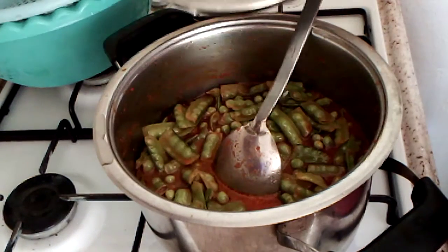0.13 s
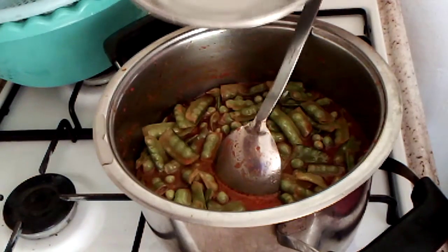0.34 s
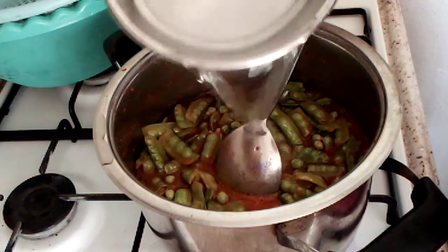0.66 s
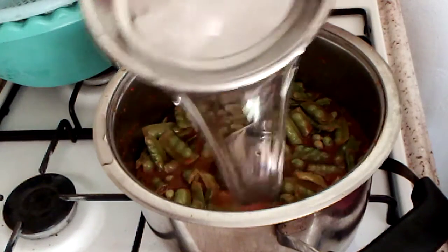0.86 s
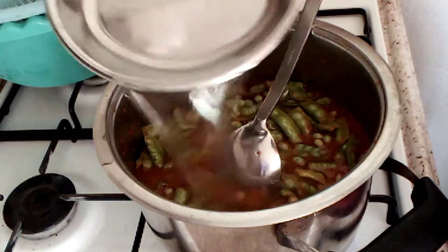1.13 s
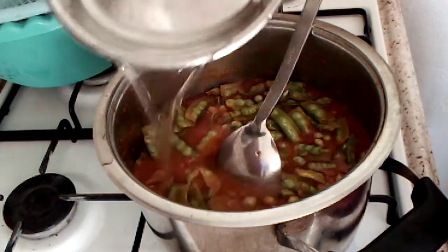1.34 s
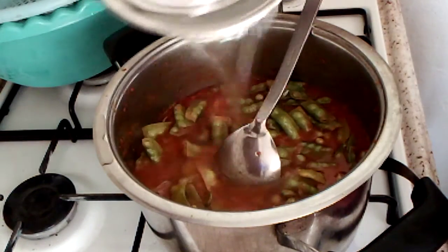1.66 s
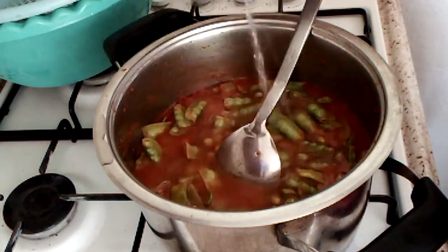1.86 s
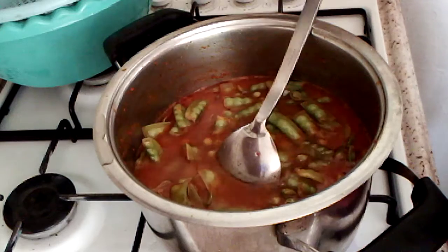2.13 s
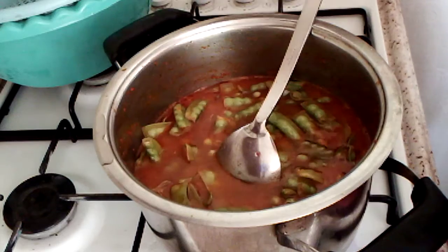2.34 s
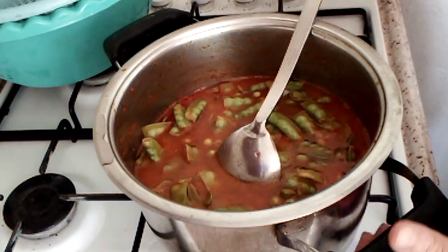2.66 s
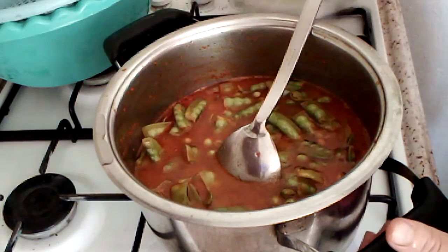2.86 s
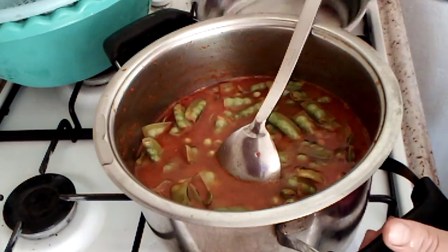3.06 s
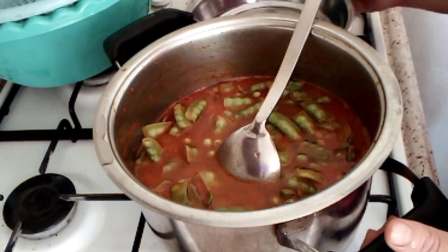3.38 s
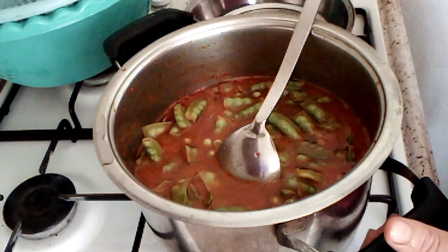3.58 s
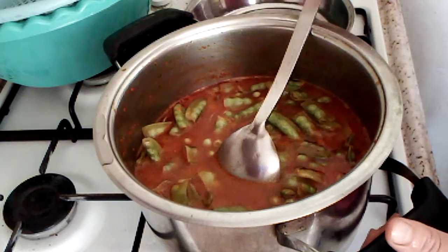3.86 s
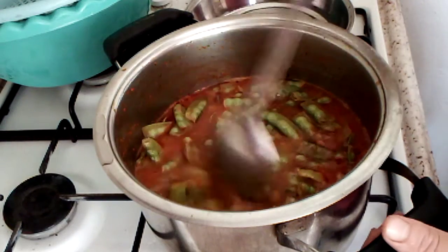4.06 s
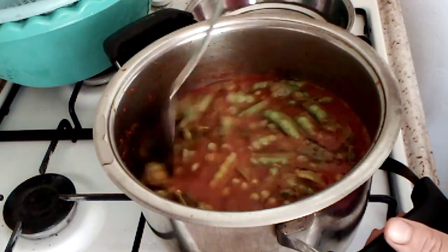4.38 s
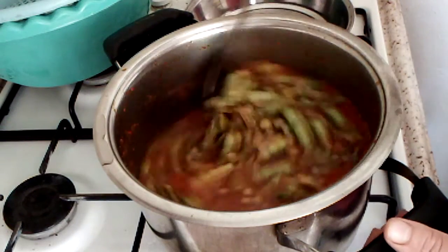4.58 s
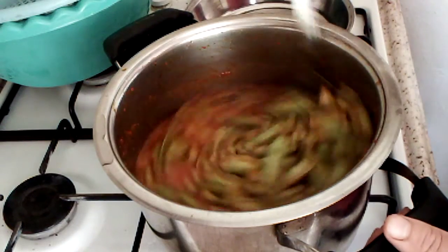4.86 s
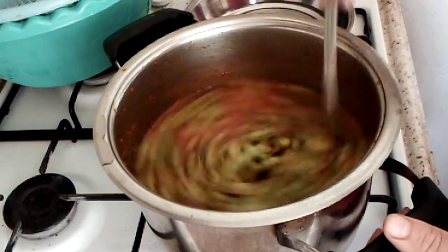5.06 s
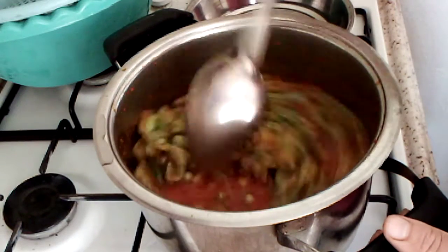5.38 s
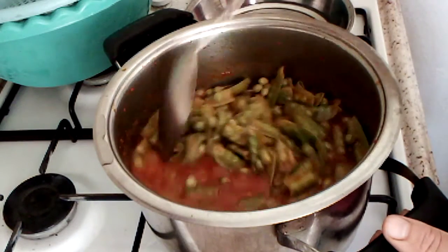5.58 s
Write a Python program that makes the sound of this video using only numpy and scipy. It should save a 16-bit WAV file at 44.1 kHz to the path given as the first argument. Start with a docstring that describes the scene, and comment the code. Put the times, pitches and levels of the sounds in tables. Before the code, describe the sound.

Soft burner hiss, then a short, bubbly pour of water into a pot of beans, fizzing and humming in the metal. A pause with a thin squeak, a hard ringing clang of a steel bowl, and a lid rocking faster and softer until still. A metal ladle then knocks and drags around the pot in two strong scraping strokes with wet plops. Close microphone, single channel, short hard-walled kitchen echo.

```python
"""Water, bowl, lid and ladle around a pot of stew

Over the soft rush of a gas flame, water from a steel bowl pours onto a pot of beans: clouds of bubbles, single
drops, and air humming in the pot. A thin squeak follows. The bowl lands with a clang and is nudged along, and
a steel lid rattles to rest: ringing modes plus dense clatter. A metal ladle knocks on the pot, scrapes its wall
(tiny slips through resonances) and pushes waves of bubbling stew. A small kitchen adds its echo.
"""
import sys
import numpy as np
from scipy import signal
from scipy.fft import rfft, irfft, next_fast_len
from scipy.io import wavfile

SR = 44100
rng = np.random.default_rng(int(sys.argv[2]) if len(sys.argv) > 2 else 0)


def transcribe(u):
    """Save the signal u as a 16-bit wav file named by the first command-line argument.

    u: samples, shape (n,) or (channels, n), limited to [-1, 1]; the rate is SR.
    q: integer samples, one column per channel.
    """
    v = np.clip(np.atleast_2d(u).T, -1, 1)
    q = np.round(v * 32767).astype(np.int16)
    wavfile.write(sys.argv[1], SR, q)


N = 251811
TIME = np.arange(N) / SR
CUTOFF_HZ = 15950  # top of the treble


def from_db(db):
    """Turn decibels into a gain."""
    return 10 ** (np.asarray(db) / 20)


def rms_one(x):
    """Scale a sound to an rms of 1."""
    return x / np.sqrt(np.mean(x ** 2) + 1e-20)


def gains(rows):
    """Turn each dB column of a curve into a gain over time, silent outside its span."""
    seconds, *columns = np.transpose(rows)
    return [from_db(np.interp(TIME, seconds, c, left=-np.inf, right=-np.inf)) for c in columns]


def held(start, length, attack_s, release_s):
    """A gain that rises quickly, holds and dies away."""
    age = np.maximum(TIME - start, 0)
    rise = 1 - np.exp(-age / attack_s)
    return rise * np.exp(-np.maximum(age - length, 0) / release_s)


def drift(rate):
    """A random wander around 0 with a spread of about 1, aiming at `rate` new values a second."""
    return np.interp(TIME * rate, np.arange(2000), rng.standard_normal(2000))


def at_hz(points, hz):
    """Read a table between its points, on a logarithmic frequency axis."""
    table_hz, value = np.transpose(points)
    return np.interp(np.log(hz + 1e-9), np.log(table_hz), value)


def colour(x, spectrum):
    """Shape a steady sound by a spectrum, to an rms of 1."""
    size = next_fast_len(len(x))
    gain = from_db(at_hz(spectrum, np.fft.rfftfreq(size, 1 / SR)))
    return rms_one(irfft(rfft(x, size) * gain, size)[:len(x)])


def convolve(x, response):
    """Play a sound through a response."""
    return signal.fftconvolve(x, response)[:N]


def low_pass(x, cut_hz):
    """Dull a sound gently above a frequency."""
    return signal.lfilter(*signal.butter(1, cut_hz, fs=SR), x)


def ring(clicks, hz, t60):
    """Each unit click starts a sine of height 1 that falls by 60 dB in t60 seconds."""
    radius, angle = from_db(-60 / (t60 * SR)), 2 * np.pi * hz / SR
    feedback = [1, -2 * radius * np.cos(angle), radius ** 2]
    return signal.lfilter([0, np.sin(angle)], feedback, clicks + 1e-18)  # the tiny offset keeps the filter fast


def resonance(x, hz, width_hz):
    """A single resonance that picks out the band around its pitch."""
    radius = np.exp(-np.pi * width_hz / SR)
    feedback = [1, -2 * radius * np.cos(2 * np.pi * hz / SR), radius ** 2]
    return (1 - radius ** 2) * signal.lfilter([1, 0, -1], feedback, x)


def resonate(x, peaks):
    """Add up resonances side by side, with alternating signs, to an rms of 1."""
    return rms_one(sum((-1) ** k * from_db(db) * resonance(x, hz, width)
                       for k, (hz, width, db) in enumerate(peaks)))


def strikes(hits, spread_db=0):
    """One click per contact, its strength varied by chance."""
    clicks = np.zeros(N)
    for start, db in hits:
        clicks[round(start * SR)] += from_db(db + spread_db * rng.standard_normal())
    return clicks


def grains(per_s, spread_db):
    """Random clicks of unequal size and either sign."""
    sizes = from_db(spread_db * np.minimum(rng.exponential(1, N), 4))
    signs = rng.choice([-1, 1], N)
    return sizes * signs * (rng.random(N) < per_s / SR)


def bubbles(per_s, low_hz, high_hz, cycles, spread_db, count=24):
    """A cloud of bubbles, each ringing for some cycles at a pitch set by its size; rms 1."""
    born = grains(per_s, spread_db)
    size_class = rng.integers(0, count, N)
    cloud = 0
    for k, hz in enumerate(np.geomspace(low_hz, high_hz, count)):
        cloud = cloud + ring(born * (size_class == k), hz, cycles / hz) / hz
    cloud = np.diff(cloud, prepend=0)
    # a bubble starts softly, without a click above its own pitch
    soften = signal.butter(3, min(1.06 * high_hz, CUTOFF_HZ), fs=SR, output="sos")
    return rms_one(signal.sosfilt(soften, cloud))


def inside_pot(x, wall_db, t60=0.062):
    """Sound bounces between the steel walls before it leaves the pot; the energy is kept."""
    t = TIME[:SR // 6]
    bounces = rng.standard_normal(len(t)) * from_db(-60 * t / t60) * (t > .0007)
    direct = (t == 0)
    response = from_db(wall_db) * bounces / np.linalg.norm(bounces) + direct
    return convolve(x, response / np.linalg.norm(response))


# The flame's rush. Each row: frequency in Hz, strength in dB per Hz.
FLAME = [(25, -5), (60, -3), (120, -0.5), (200, -0.5), (450, -5.5), (900, -11.5), (1500, -8), (2100, -15),
         (5000, -20), (7500, -30.5), (12000, -33.5), (16000, -27.5)]
# The hollows of stove and pot that colour it. Each row: frequency in Hz, width in Hz, strength in dB.
HOLLOWS = [(101.6, 4.3, 4.5), (268, 6, -0.5), (316.4, 9.6, 5), (325.7, 11, 4), (353, 6.1, 2.5),
           (601, 77, -7.5), (1270, 90, -6), (1543, 65, -7), (3225, 27, -14.5), (4190, 190, -18),
           (5420, 136, -20)]


def burner(level_db=-73.5):
    """The flame's soft, steady rush is noise, partly ringing in the hollows of stove and pot."""
    rush = from_db(-1.5) * colour(rng.standard_normal(N), FLAME)
    hollow = from_db(3.5) * resonate(rng.standard_normal(N), HOLLOWS)
    return from_db(level_db) * (rush + hollow)


# Strength of the stream of water. Each row: time in seconds, strength in dB.
FLOW = [(0.7, -87), (0.838, -70.5), (0.968, -68), (1.118, -68), (1.53, -72), (1.81, -74.5), (1.964, -75),
        (2.12, -86)]
# Gushes that slap on the beans and the ladle.
# Each row: start in seconds, length in seconds, splash strength in dB, fine spray strength in dB.
GUSHES = [(0.773, 0.0043, -78, -71), (0.91, 0.03, -66, -80), (1.058, 0.023, -67.5, -100),
          (1.184, 0.054, -66, -103), (1.371, 0.035, -69.5, -78), (1.677, 0.012, -73, -77),
          (1.747, 0.014, -72.5, -71.5), (1.81, 0.1, -69.5, -81)]
# The air in the pot, set humming by the stream. Each row: frequency in Hz, width in Hz, strength in dB.
POT_AIR = [(179, 53, -16), (259, 9.8, -7), (310, 7.9, 0.5), (672, 50, -10)]


def pour(fizz_db=-2.5, gurgle_db=-5.5, mist_db=-21, drum_db=-2, drum_follows=1.8):
    """The stream splashes on the beans: bubbles, fine spray, a little gurgle and a hollow drumming."""
    flow, = gains(FLOW)
    splash, spray = from_db(fizz_db) * flow, from_db(mist_db) * flow
    for start, length, splash_db, spray_db in GUSHES:
        gush = held(start, length, attack_s=0.0039, release_s=0.005)
        splash = splash + from_db(splash_db) * gush
        spray = spray + from_db(spray_db) * gush
    fizz = bubbles(per_s=650, low_hz=2450, high_hz=6800, cycles=44, spread_db=3.5)
    gurgle = bubbles(per_s=400, low_hz=1115, high_hz=1890, cycles=19, spread_db=1.0)
    mist = bubbles(per_s=800, low_hz=6500, high_hz=15500, cycles=60, spread_db=4.5)
    # only the full stream drums hard enough to set the air in the pot humming
    weight = flow.max() * (flow / flow.max()) ** drum_follows
    drumming = from_db(drum_db) * weight * resonate(grains(per_s=730, spread_db=4.0), POT_AIR)
    return splash * (fizz + from_db(gurgle_db) * gurgle) + spray * mist + drumming


# The largest bubbles, from bright drips to thick plops.
# Each row: start in seconds, peak level in dB before the pot's bounces, pitch in Hz.
DROPS = [(0.775, -60.5, 6340), (0.797, -48, 3050), (0.914, -57.5, 12100), (0.919, -49, 3460),
         (0.927, -47.5, 4480), (1.007, -54, 2570), (1.159, -49.5, 5320), (1.183, -50, 2750),
         (1.21, -51.5, 2530), (1.253, -55, 1800), (1.677, -52.5, 4200), (1.75, -53.5, 8200),
         (1.754, -49.5, 5250), (4.634, -47, 820), (5.072, -41, 3740), (5.109, -45, 760),
         (5.149, -48.5, 1815), (5.236, -54, 4960), (5.412, -55.5, 2660)]


def drops(cycles=38, rise=0.02, onset_cycles=1.1, splinter_db=-9, splinter_s=0.016, count=4):
    """Each drop traps a bubble whose note rises a little as it dies, with a few fainter ones after it."""
    out, t = np.zeros(N), TIME[:SR // 12]
    for start, db, hz in DROPS:
        family = [(start, db, hz)]
        for late, size in rng.random((count, 2)):
            splinter_hz = min(hz * 2 ** (size - .5), CUTOFF_HZ)  # within half an octave either way
            family.append((start + splinter_s * late, db + splinter_db, splinter_hz))
        for born, level_db, pitch in family:
            age = t * pitch / cycles  # 1 when the note has fallen by 60 dB
            tone = np.sin(2 * np.pi * pitch * t * (1 + rise * np.minimum(age, 2)))
            onset = 1 - np.exp(-t * pitch / onset_cycles)
            note = tone * onset * np.exp(-np.log(1000) * age)
            at = round(born * SR)
            out[at:at + len(t)] += from_db(level_db) * note[:N - at] / note.max()
    return out


# The ladle knocks on the pot.
# Each row: time in seconds, strength in dB, cut-off of the contact in Hz (lower is duller).
KNOCKS = [(1.8927, -8.5, 1380), (4.5416, 2.5, 9300), (4.61, -21, 12000), (5.301, -14, 7000)]
# How the pot wall rings, damped by the stew.
# Each row: frequency in Hz, strength in dB, time to fall by 60 dB in seconds.
POT_MODES = [(214, -26.5, 0.26), (337, -35.5, 0.17), (561, -15.5, 0.12), (722, -14, 0.046),
             (810, -67, 0.076), (1340, 7, 0.032), (1354, 10.5, 0.013), (1792, 0, 0.03), (2220, -3.5, 0.012),
             (2825, -4.5, 0.015), (3532, -6, 0.017), (4070, -14, 0.033), (4965, -1.5, 0.013),
             (5500, -19, 0.041), (6270, -6.5, 0.0024)]


def knocks(bounce_s=0.002548, bounce_db=-6, low_cut_hz=220, tick_db=-30, ring_db=-30.5):
    """The ladle hits the wall and touches once more; the stew soon stops the ring."""
    push = np.zeros(N)
    for start, db, cut_hz in KNOCKS:
        push += low_pass(strikes([(start, db), (start + bounce_s, db + bounce_db)]), cut_hz)
    # the knocks carry little deep bass
    push = signal.lfilter(*signal.butter(2, low_cut_hz, "high", fs=SR), push)
    wall = sum((-1) ** k * from_db(db) * ring(push, hz, t60) for k, (hz, db, t60) in enumerate(POT_MODES))
    return from_db(tick_db) * push + from_db(ring_db) * wall


def squeak(start=2.305, length=0.03, pitch_hz=3220, level_db=-72, waver_hz=30):
    """One faint, thin note after the pour, a sine whose pitch wavers slightly."""
    note = rms_one(np.sin(2 * np.pi * np.cumsum(pitch_hz + waver_hz * drift(150)) / SR))
    return from_db(level_db) * held(start, length, attack_s=0.0069, release_s=0.025) * note


# How long sound lingers in the kitchen; it also sets how fast clatter and weak steel partials die.
# Each row: frequency in Hz, time to fall by 60 dB in seconds, which each use scales.
KITCHEN = [(100, 0.8), (400, 0.87), (1500, 0.74), (4000, 0.59), (7000, 0.43), (11000, 0.26), (16000, 0.25)]


def dying_noise(spectrum, t60_scale):
    """One second of coloured noise, rms about 1 at first, each band dying at the kitchen's scaled pace."""
    noise = rfft(colour(rng.standard_normal(SR), spectrum))
    hz = np.arange(SR // 2 + 1)
    edges = np.geomspace(20, 20000, 13)
    out = 0
    for low, high in zip(edges, edges[1:]):
        band = irfft(noise * (hz >= low) * (hz < high), SR)
        t60 = t60_scale * at_hz(KITCHEN, np.sqrt(low * high))
        out = out + band * 1e-3 ** (TIME[:SR] / t60)
    return out


def faint_modes(spectrum, t60_scale, count=300):
    """The crowd of weak partials of thin steel, unevenly spaced; rms about 1 at first."""
    t = TIME[:SR * 3 // 4].astype(np.float32)
    places = np.arange(count) + rng.random(count)
    pitches = np.interp(places, [0, 2 * count / 3, count], [320, 6500, CUTOFF_HZ])
    sizes = from_db(at_hz(spectrum, pitches) + 3 * rng.standard_normal(count))
    sizes *= np.sqrt(2 / np.sum(sizes ** 2)) * rng.choice([-1, 1], count)
    decays = np.log(1000) / (t60_scale * at_hz(KITCHEN, pitches))
    phases = rng.uniform(0, 2 * np.pi, count)
    return sum(size * np.sin(float(2 * np.pi * hz) * t + float(phase)) * np.exp(-float(decay) * t)
               for size, hz, decay, phase in zip(sizes, pitches, decays, phases))


def steel_dish(hits, modes, clatter, ring_db, rering_db, soft_hz, crowd_db, crash_db,
               crowd_scale, crash_scale, spread_s=.0009):
    """Thin steel on the worktop: a noisy crash, clear modes and a crowd of weaker partials."""
    # after the hard landing the dish only rocks: duller contacts
    landing = strikes(hits[:1])
    rocking = low_pass(strikes(hits[1:]), soft_hz)
    tones = 0
    for hz, db, t60 in modes:
        # each contact excites each mode by a different amount
        again = low_pass(strikes(hits[1:], spread_db=5.5), soft_hz) * rng.choice([-1, 1])
        push = landing + from_db(rering_db) * again
        tones = tones + from_db(db) * rng.choice([-1, 1]) * ring(push, hz, t60)
    # the bending waves take a moment to spread through the sheet
    swell = 1 - np.exp(-np.maximum(TIME - hits[0][0], 0) / spread_s)
    crash = convolve(landing + rocking, dying_noise(clatter, crash_scale))
    crowd = convolve(landing + rocking, faint_modes(clatter, crowd_scale))
    return swell * (from_db(ring_db) * tones + from_db(crowd_db) * crowd + from_db(crash_db) * crash)


# The bowl lands and settles on its foot. Each row: time in seconds, strength in dB.
BOWL_HITS = [(3.1265, 1), (3.1335, -22), (3.1415, -15.5)]
# How the bowl rings. Each row: frequency in Hz, strength in dB, time to fall by 60 dB in seconds.
BOWL_MODES = [(118, -19, .45), (188, -11, .45), (242, -18, .45), (311, -13, .45), (410, -24, 1.2),
              (427, -14, .65), (581, -13, .45), (851, -13, .47), (949, -14, .45), (1599, -14, .3),
              (1701, -23, .9), (1966, -6, .25), (2138, -13, .45), (2285, -2, .47), (2676, -13, .3),
              (2756, -9, .42), (2880, -1, .25), (3270, -5, .3), (3428, -1, .27), (3572, -8, .3),
              (3704, -11, .23), (3755, -9, .3), (3844, -8, .23), (4155, -11, .22), (4240, -16, .28),
              (4510, -13, .34), (4646, -18, .3), (5626, -24, .3), (6035, -18, .2), (7343, -24, .21)]
# Dense clatter of bowl and worktop. Each row: frequency in Hz, strength in dB per Hz.
BOWL_CLATTER = [(35, -26.5), (60, -30.5), (100, 2.5), (170, -3.5), (400, 0), (900, -0.5), (1300, -3),
                (2300, -0.5), (3500, -4), (5000, -9.5), (7000, -11.5), (10000, -25), (16000, -26)]


def bowl():
    """The steel bowl is set down with a clang as its modes ring over the clatter."""
    return steel_dish(BOWL_HITS, BOWL_MODES, BOWL_CLATTER, ring_db=-32, rering_db=0.5, soft_hz=7000,
                      crowd_db=-37.5, crash_db=-29.0, crowd_scale=0.88, crash_scale=0.54)


# The bowl is nudged along the worktop. Each row: time in seconds, strength in dB.
NUDGE = [(3.33, -67), (3.38, -72), (3.43, -64), (3.48, -71), (3.54, -82)]
# Broad rasp of steel under friction, used again by the ladle. Each row: frequency in Hz, strength in dB per Hz.
RASP = [(400, -51), (1000, 2.5), (2200, 1.5), (2800, 10.5), (5000, -3), (6800, -1.5), (8000, -12),
        (11000, -26), (16000, -26)]


def nudge(singing_db=-25.5):
    """The bowl's foot rasps briefly, and its tiny slips keep the bowl's modes singing."""
    strength, = gains(NUDGE)
    slips = grains(per_s=2800, spread_db=1.5) * strength
    singing = sum(from_db(db) * ring(slips, hz, t60) for hz, db, t60 in BOWL_MODES)
    rasp = strength * colour(grains(per_s=2900, spread_db=1), RASP)
    return from_db(singing_db) * singing + rasp


# The lid lands and bounces. Each row: time in seconds, strength in dB.
LID_LANDING = [(3.5615, 1), (3.590, -15), (3.612, -16.5)]


def lid_contacts(count=18, start=3.643, gap_s=0.0455, shrink=0.88, first_db=-3.5, loss_db=4, whirr_db=-34.5):
    """After landing, the lid rocks ever faster and more softly, down to a faint closing whirr."""
    k = np.arange(count)
    times = start + gap_s * (1 - shrink ** k) / (1 - shrink)  # each gap is a fixed share of the one before
    return list(LID_LANDING) + list(zip(times, np.maximum(first_db - loss_db * k, whirr_db)))


# How the lid rings. Each row: frequency in Hz, strength in dB, time to fall by 60 dB in seconds.
LID_MODES = [(309, -15, .65), (765, -11, .3), (816, -9, .3), (855, -9, .3), (944, -3, .48), (980, -13, .4),
             (1626, -10, .4), (1685, -17, .6), (2228, -1, .35), (2275, -9, .4), (2299, -7, .4),
             (2660, -14, .5), (2888, -13, .6), (3381, -17, .55), (3725, -13, .45), (4037, -19, .38),
             (5300, -8, .14), (5387, -5, .2), (5423, -9, .18), (5550, -10, .18), (5647, -21, .45),
             (6288, -15, .25), (8608, -26, .25)]
# Dense clatter of lid and worktop. Each row: frequency in Hz, strength in dB per Hz.
LID_CLATTER = [(35, -43), (60, -1), (110, 5.5), (300, 3), (500, -6), (850, 4.5), (1200, 0.5), (3000, 3.5),
               (5500, -6), (7000, -4.5), (10000, -19.5), (16000, -23)]


def lid():
    """The steel lid is put down and rattles to rest, each contact ringing it anew."""
    return steel_dish(lid_contacts(), LID_MODES, LID_CLATTER, ring_db=-38, rering_db=-10.5, soft_hz=4530,
                      crowd_db=-45.5, crash_db=-41.5, crowd_scale=0.93, crash_scale=0.71)


# Waves of stew pushed by the ladle.
# Each row: time of the crest in seconds, strength in dB, rise in seconds, fall in seconds.
WAVES = [(4.3, -81, 0.037, 0.08), (4.6, -53, 0.024, 0.078), (5.115, -56.5, 0.037, 0.039),
         (5.41, -72.5, 0.12, 0.13)]


def slosh():
    """Thick broth folds over the beans in short bubbles, above a low churning; each wave swells and sinks."""
    swell = sum(from_db(db) * np.exp(-np.maximum((crest - TIME) / rise, (TIME - crest) / fall))
                for crest, db, rise, fall in WAVES)
    plops = from_db(0.5) * bubbles(per_s=600, low_hz=630, high_hz=2330, cycles=16, spread_db=5.5)
    churn = from_db(-6.0) * bubbles(per_s=360, low_hz=140, high_hz=550, cycles=11.0, spread_db=0)
    return swell * (plops + churn)


# The ladle drags along the wall.
# Each row: start in seconds, length in seconds, strength in dB, sag in dB per second.
STROKES = [(4.603, 0.232, -49.5, 4), (4.909, 0.18, -50.5, 36), (5.31, 0.22, -71, 21)]
# Resonances of ladle and wall under friction. Each row: frequency in Hz, width in Hz, strength in dB.
SCRAPE_PEAKS = [(791, 60, -7), (1160, 70, -7), (1780, 180, -8), (2100, 50, -11), (2760, 60, 0),
                (2930, 60, -4), (3280, 160, -4), (3630, 140, -6), (4165, 60, -3), (4470, 50, -6),
                (4770, 100, -6), (5520, 70, -8), (6460, 50, -13)]
# Tilt of the steel's crowd of partials against the rasp. Each row: frequency in Hz, change in dB.
RASP_TILT = [(1000, 1.5), (4000, 0), (8000, 3.5), (15000, 6)]


def scrape(judder_db=1.2, rasp_hz=3860, rasp_rise_hz=991, rasp_width_hz=600):
    """Thousands of tiny slips a second excite ladle and wall; one bright band moves with the stroke."""
    pressure, speed = 0, np.zeros(N)
    for start, length, db, sag_db_per_s in STROKES:
        age = np.maximum(TIME - start, 0)
        sagging = from_db(db - sag_db_per_s * np.minimum(age, length))
        pressure = pressure + sagging * held(start, length, attack_s=0.0018, release_s=0.053)
        # fastest at mid-stroke; it runs on below zero after the stroke, so the band sinks as it fades
        speed = np.where(TIME < start, speed, np.sin(np.pi * np.minimum(age / length, 3 / 2)))
    slips = grains(per_s=2500, spread_db=3.0) * from_db(judder_db * drift(70))
    # slow noise carried up to the band's moving pitch
    turn = 2 * np.pi * np.cumsum(rasp_hz + rasp_rise_hz * speed) / SR
    slow = signal.lfilter(*signal.butter(2, rasp_width_hz, fs=SR), slips)
    moving = from_db(-7) * rms_one(slow * np.cos(turn))
    peaks = from_db(-9.0) * resonate(slips, SCRAPE_PEAKS)
    rasp = from_db(-6) * colour(slips, RASP)
    crowd = convolve(slips, faint_modes(RASP, t60_scale=0.22, count=150))
    partials = from_db(-6.5) * colour(crowd, RASP_TILT)
    return pressure * (peaks + rasp + partials + moving)


def kitchen(x, delay_s=.006):
    """The diffuse echo of hard walls is dying noise, of unit energy, after a short delay."""
    tail = dying_noise([(100, 3.5), (2000, -10), (6000, -9.5), (16000, -2.0)], t60_scale=0.66)
    tail = np.concatenate([np.zeros(round(delay_s * SR)), tail])
    return convolve(x, tail / np.sqrt(np.sum(tail ** 2)))


def scene():
    """Water and ladle sound from inside the pot; bowl and lid lie beside the stove."""
    flame = burner()
    water = inside_pot(pour() + drops(), wall_db=-3.0)
    ladle = inside_pot(knocks(), wall_db=-2.5, t60=0.063)
    dishes = bowl() + lid()
    stirring = inside_pot(slosh() + scrape(), wall_db=-2.0)
    sent = from_db(-9) * water + from_db(-5.5) * ladle + from_db(-17.5) * stirring + from_db(-13.0) * dishes
    mix = flame + water + ladle + squeak() + dishes + nudge() + stirring + kitchen(sent)
    return mix[None]


def record(dry, port_hz=15200, port_width_hz=1100, port_db=16, low_cut_hz=50):
    """The microphone drops the deep bass and its port rings in the top treble; above that the sound is cut."""
    dry = signal.sosfilt(signal.butter(2, low_cut_hz, "high", fs=SR, output="sos"), dry)
    port = resonance(dry, port_hz, port_width_hz) / 2
    treble_cut = signal.ellip(12, .2, 70, CUTOFF_HZ, fs=SR, output="sos")
    return signal.sosfilt(treble_cut, dry + from_db(port_db) * port)


dry = scene()
out = record(dry)
transcribe(out)
```